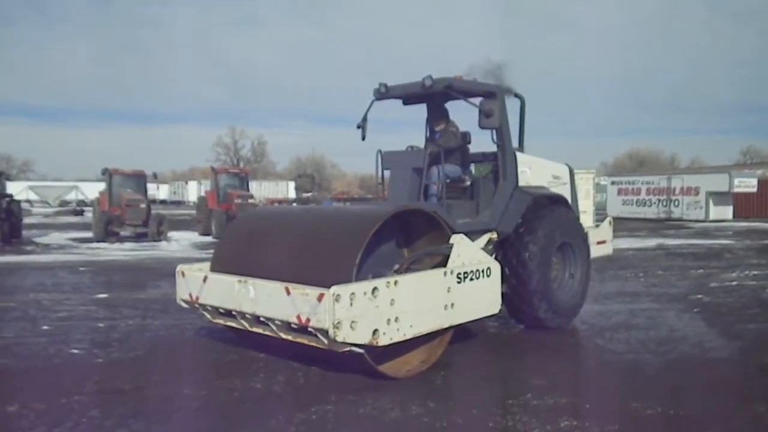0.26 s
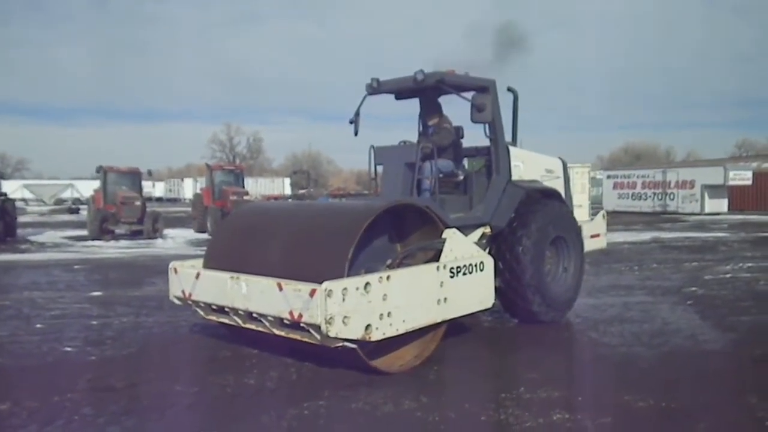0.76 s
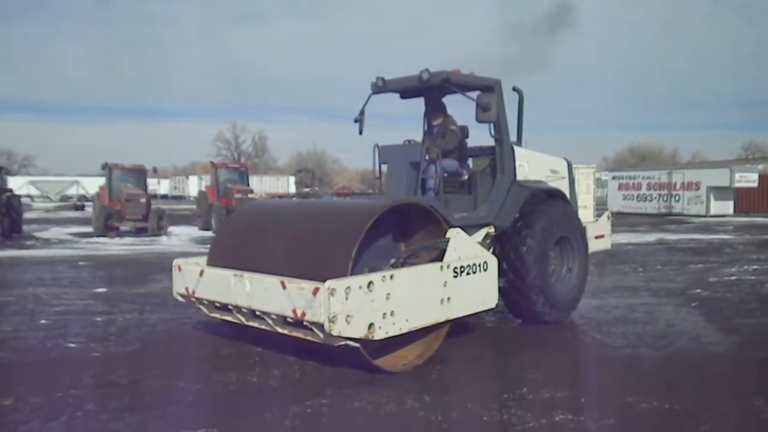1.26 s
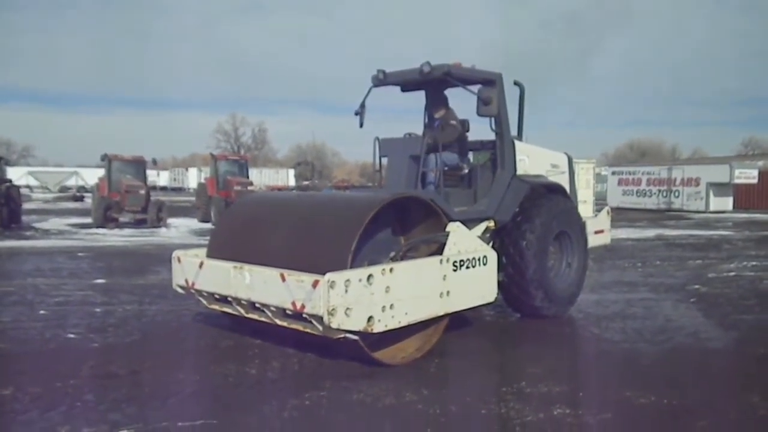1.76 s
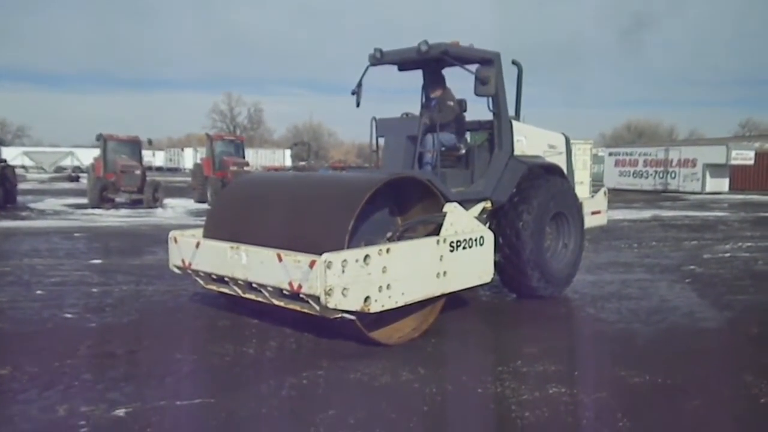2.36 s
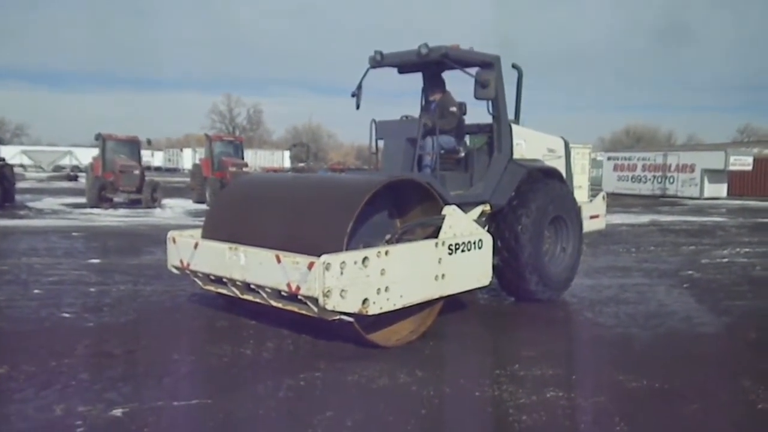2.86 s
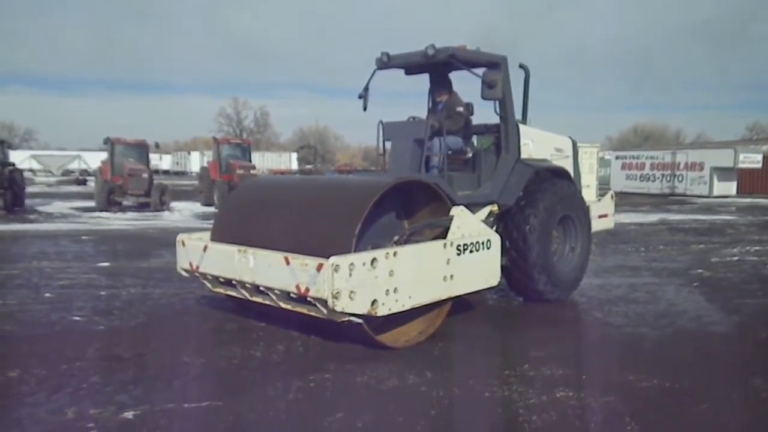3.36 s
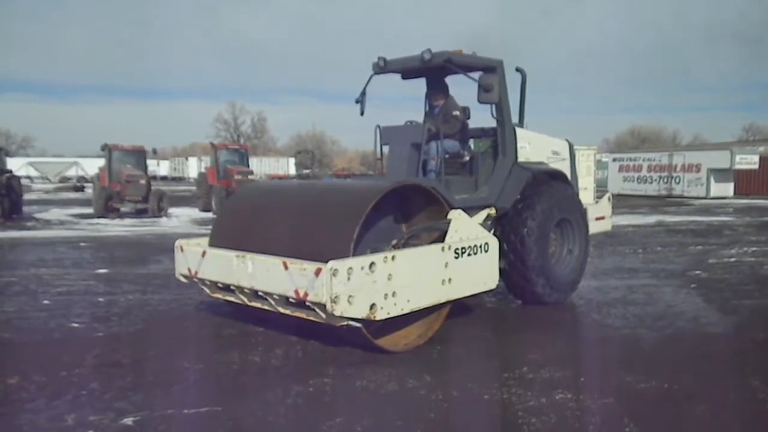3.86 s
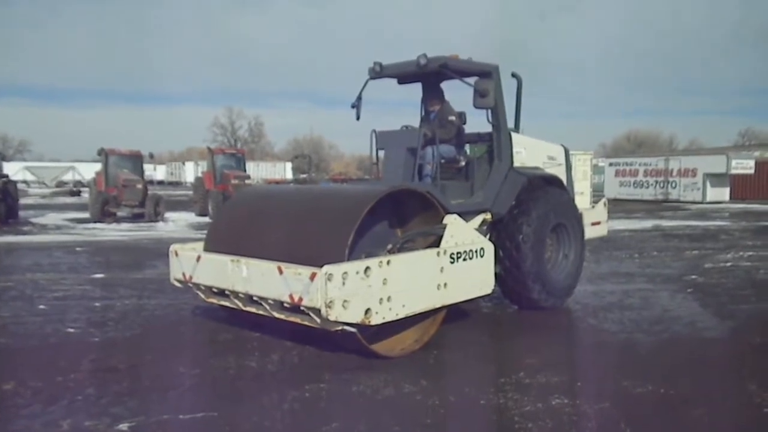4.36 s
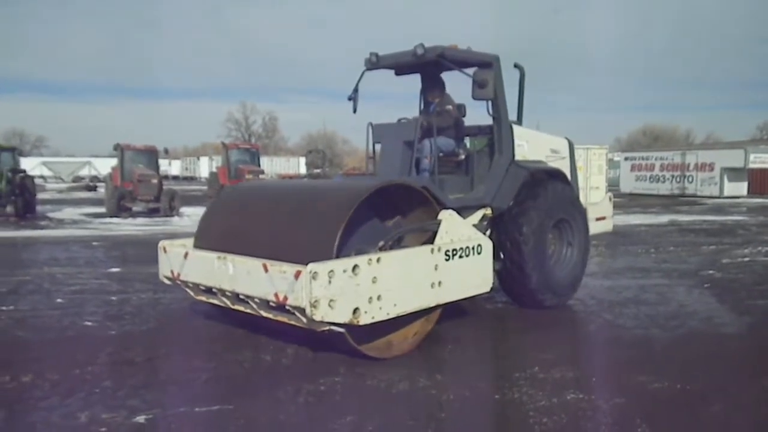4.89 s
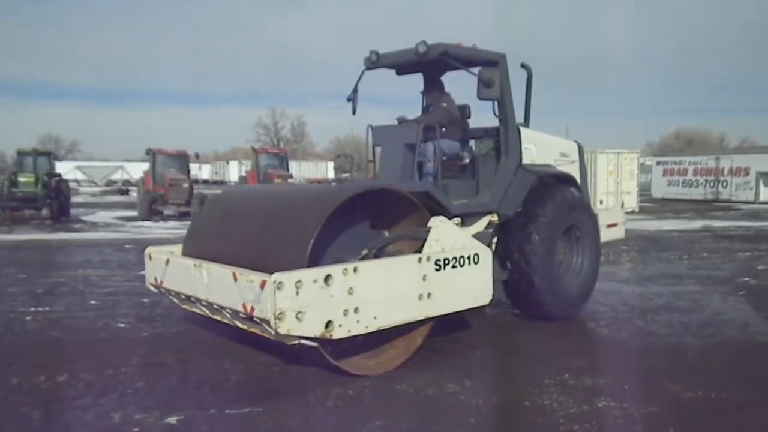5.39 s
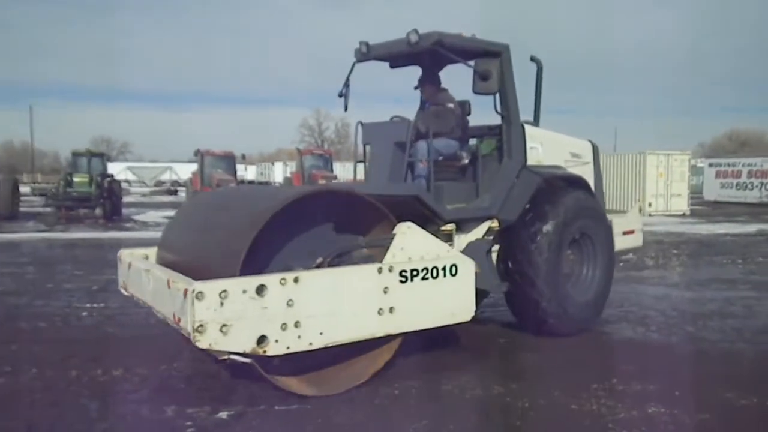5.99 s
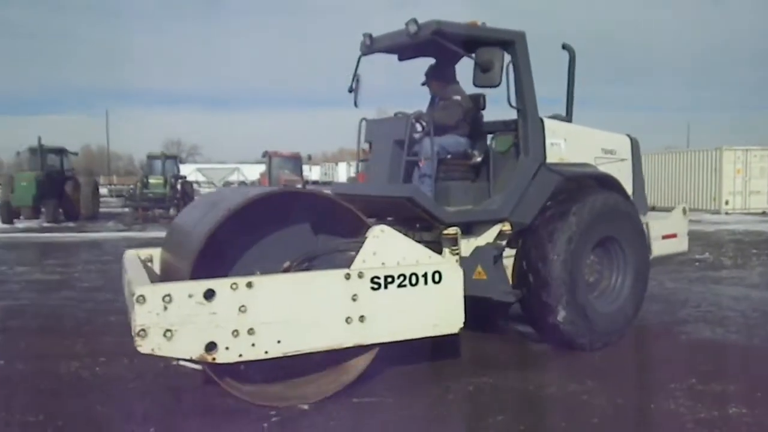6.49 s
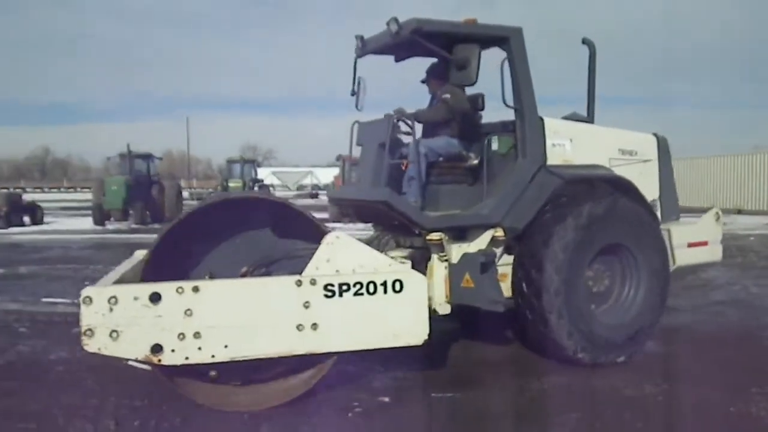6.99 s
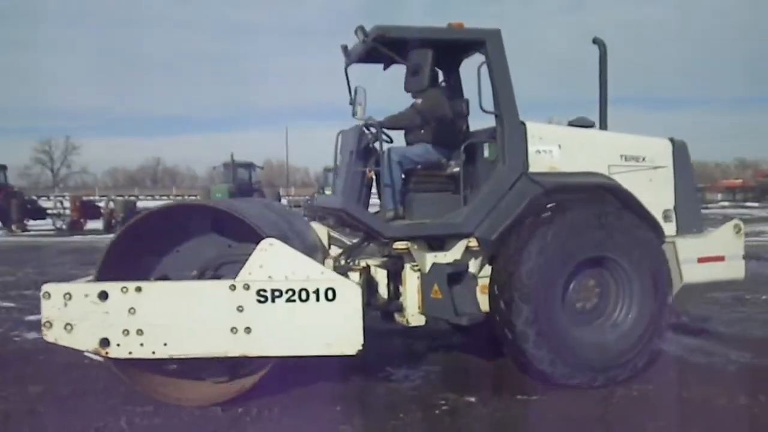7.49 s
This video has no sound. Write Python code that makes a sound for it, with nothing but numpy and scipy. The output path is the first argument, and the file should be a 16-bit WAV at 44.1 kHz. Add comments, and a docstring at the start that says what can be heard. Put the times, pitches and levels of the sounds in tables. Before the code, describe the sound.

A large diesel road roller on an open lot starts with sharp injector spits and hard knocks, then falls to a light clattering idle with a thin whine. At full fuel it knocks hard again, climbs about an octave and a half, and settles into a steady, rattling roar with a singing cooling fan. Close small microphone, thin bass and dull top, slight breeze.

```python
"""First come sharp spits and hard knocks as a six-cylinder diesel road roller drops to idle on open gravel.
Then it takes full fuel, climbs with more knocking and settles at working speed, where the cooling fan sings.
Firings shake noise and ringing from the metal, the exhaust puffs, and sine waves follow the shaft.
A light breeze, a few low thumps and one thin tick are near the small microphone, thin in bass and treble."""
import sys
import numpy as np
from scipy import signal
from scipy.fft import rfft, irfft, next_fast_len
from scipy.io import wavfile
from scipy.ndimage import uniform_filter1d, map_coordinates

SR = 44100
rng = np.random.default_rng(int(sys.argv[2]) if len(sys.argv) > 2 else 0)


def int16_out(signal):
    """Quantize to a 16-bit WAV file."""
    q = np.round(np.clip(np.atleast_2d(signal).T, -1, 1) * 32767)
    wavfile.write(sys.argv[1], SR, q.astype(np.int16))


N = 341334  # length [samples]


def amp(db):
    """Turn decibels into a gain."""
    return 10 ** (np.asarray(db) / 20)


def unit(x):
    """Scale x to an rms of 1."""
    return x / np.sqrt(np.mean(x ** 2) + 1e-20)


def seconds(duration=N / SR):
    """Time of every sample [s]."""
    return np.arange(int(round(duration * SR))) / SR


def curves(rows):
    """Draw straight lines between timed points, one curve for each column after the time."""
    times, *columns = np.transpose(rows)
    return [np.interp(seconds(), times, column) for column in columns]


def wobble(rate):
    """A smooth random curve with rate random points a second."""
    knots = rng.standard_normal(int(N * rate / SR) + 4)
    return map_coordinates(knots, [np.arange(N) * rate / SR])


def coloured(x, points):
    """Shape the pitch balance of x with a filter that never sounds ahead of its input, at rms 1."""
    m = next_fast_len(N + 8192, real=True) // 2 * 2
    hz, db = np.transpose(points)
    gain = amp(np.interp(np.log(np.fft.rfftfreq(m, 1 / SR) + 1), np.log(hz + 1), db))
    # folding the cepstrum puts the filter's response after its input
    cepstrum = irfft(np.log(gain + 1e-6), m)
    cepstrum[1:m // 2] *= 2
    cepstrum[m // 2 + 1:] = 0
    return unit(irfft(rfft(x, m) * np.exp(rfft(cepstrum)), m)[:N])


def patchy(depth_db):
    """Noise that is louder and softer in random patches of time and pitch."""
    noise = signal.stft(rng.standard_normal(N), nperseg=512)[2]
    over_pitch = uniform_filter1d(rng.standard_normal(noise.shape), size=5, axis=0)
    patches = unit(uniform_filter1d(over_pitch, size=12, axis=1))
    return unit(signal.istft(noise * amp(depth_db * patches), nperseg=512)[1][:N])


def sine(cycles, sway, waver_db):
    """A slightly unsteady sine wave: both its level and its phase waver."""
    waver = amp(waver_db * wobble(7))
    return np.sqrt(2) * waver * np.sin(2 * np.pi * cycles + sway * wobble(6))


# Engine speed: (time [s], firings per second [Hz])
ENGINE_SPEED = [(0, 50), (.2, 56), (.45, 37.7), (2.5, 37.7), (2.62, 48.9), (3.72, 106.7), (3.95, 111.8),
                (4.15, 111), (4.55, 108.4), (4.85, 109.8), (6, 110), (6.3, 111.5), (6.5, 111),
                (6.82, 108.3), (7.1, 110.1), (7.4, 111.1), (7.74, 111)]


def firings():
    """Add up the engine speed into a running count of firings."""
    return np.cumsum(curves(ENGINE_SPEED)[0]) / SR


def octaves():
    """Engine speed in octaves above or below the working speed of 110 firings a second."""
    return np.log2(curves(ENGINE_SPEED)[0] / 110)


def turn():
    """The roller swings round: 0 is nose-on, 1 is side-on."""
    start_s, end_s = 5.4, 7.1
    return np.clip((seconds() - start_s) / (end_s - start_s), 0, 1)


# Fuel given to the engine: (time [s], share of full fuel [0-1])
FUEL_SHARE = [(0, 0.7), (.028, .55), (.036, 0.74), (.2, 0.8), (.26, 0.58), (.45, 0.1), (2.535, 0.05),
              (2.545, 0.86), (2.8, 1), (7.74, 0.98)]


def level(no_fuel_db, full_db, octave_db, side_on_db):
    """Level [dB] from fuel, at working speed, plus a change per octave of speed and for the turn."""
    fuel = np.clip(curves(FUEL_SHARE)[0], 0, 1)
    from_fuel = no_fuel_db + fuel * (full_db - no_fuel_db)
    return from_fuel + octave_db * octaves() + side_on_db * turn()


# How strongly each of the six cylinders fires, in firing order: strength [dB]
CYLINDER_STRENGTH = [0.36, -1.5, -2, -2.5, -1, 1.1]


def beat(count, depth, scatter_db, fall):
    """Gain that jumps at every firing and fades until the next, with cylinder and chance differences."""
    number = count.astype(int)
    luck = scatter_db * rng.standard_normal(number[-1] + 1)
    size = amp(np.take(CYLINDER_STRENGTH, number % 6) + luck[number])
    return 1 - depth + depth * size * fall * np.exp(-fall * (count % 1))


# Sharp injector spits as fuel comes on: (time [s], level before the rise and fall are shaped [dB])
INJECTOR_SPITS = [(0.0094, -25), (0.0543, -25), (0.0897, -23), (0.1271, -19), (0.1521, -28), (0.179, -23),
                  (0.2029, -29), (2.5376, -29), (2.5765, -27), (2.6688, -35), (2.7544, -34), (2.7816, -28),
                  (2.8175, -32), (2.8494, -30), (2.9163, -31), (3.0294, -32), (3.1494, -30)]


def spits():
    """Each spit opens the hiss quickly and lets it die away in a few milliseconds."""
    gain, t = np.zeros(N + SR), seconds(.05)
    shape = (1 - np.exp(-t / 0.002)) * np.exp(-t / 0.0046)
    for start_s, db in INJECTOR_SPITS:
        gain[round(start_s * SR):][:len(t)] += amp(db) * shape
    return gain[:N]


# Pitch balance of the injector hiss: (frequency [Hz], relative level [dB per Hz])
HISS_COLOUR = [(2240, -32), (3800, -2.5), (4200, -7.5), (6120, -14), (6960, -21.5), (7790, -20.5),
               (8710, -29), (9680, -28), (11000, -43), (13400, -28), (15500, -40.5)]
# Pitch balance of the very high fizz: (frequency [Hz], relative level [dB per Hz])
FIZZ_COLOUR = [(7000, -120), (9000, -25), (10300, -9), (11000, -13), (11700, -8), (12800, -6), (13300, .5),
               (13800, -8.5), (15000, -13), (15700, -19), (20000, -120)]


def injectors(count):
    """Injectors hiss in step with the firings and spit; a very high fizz shares the hiss's unevenness."""
    uneven = amp(.6 * wobble(11) + 0.41 * wobble(25))
    hiss_gain = amp(level(-49, -39.5, octave_db=-1.5, side_on_db=1.2)) * uneven + spits()
    fizz_gain = amp(level(-85, -59, octave_db=2, side_on_db=-1.5)) * uneven
    pulse = beat(count, depth=0.12, scatter_db=4, fall=1.8)
    hiss = hiss_gain * coloured(pulse * patchy(1.7), HISS_COLOUR)
    return hiss + fizz_gain * coloured(patchy(.9), FIZZ_COLOUR)


def repeating(count):
    """Alternate firings form two banks that shake the metal in their own slowly drifting pattern."""
    number = count.astype(int)
    edge = np.diff(number, prepend=0) > 0
    t, out = seconds(.05), np.zeros(N)
    die_away = amp(-60 * t / 0.047)
    for bank in range(2):
        blows = edge * (number % 2 == bank)
        for shake in rng.standard_normal((3, len(t))):
            out += wobble(1.476) * signal.fftconvolve(blows, shake * die_away)[:N]
    return unit(out)


# Pitch balance of the engine block: (frequency [Hz], relative level [dB per Hz])
BLOCK_COLOUR = [(410, -41), (700, -5.5), (762, -16.5), (842, -3.5), (934, -10.5), (1070, -2), (1400, 1),
                (1590, -3), (1860, -4), (2300, -5), (2990, -21), (5060, -120)]


def block(pulse, same):
    """Pressure blows shake the heavy engine block."""
    gain = amp(level(-41, -24, octave_db=-2.5, side_on_db=2.5))
    return gain * coloured(pulse * patchy(0.2) + 0.29 * same, BLOCK_COLOUR)


# Pitch balance of the sheet covers: (frequency [Hz], relative level [dB per Hz])
COVERS_COLOUR = [(940, -33.5), (1600, -3.5), (1860, -9), (2740, -0.5), (4190, -15.5), (6000, -31),
                 (7800, -42), (13200, -120)]
# Pitch balance of the covers' main way of ringing: (frequency [Hz], relative level [dB per Hz])
RING_COLOUR = [(900, -120), (1900, -35.5), (2400, -1.5), (2700, 3.5), (2950, -5.5), (3600, -21),
               (7000, -120)]


def covers(pulse, same):
    """The same blows rattle the thin sheet covers and ring their main mode."""
    rattle_gain = amp(level(-39.5, -22, octave_db=2, side_on_db=0.8))
    ring_gain = amp(level(-62, -23.5, octave_db=-3, side_on_db=-4))
    rattle = rattle_gain * coloured(pulse * patchy(0.99) + 0.35 * same, COVERS_COLOUR)
    return rattle + ring_gain * coloured(pulse * patchy(0.27) + 0.45 * same, RING_COLOUR)


# Sudden fuel makes every firing knock:
# (start [s], end [s], block strength at start [dB], covers strength at start [dB])
FUEL_SURGES = [(.03, .31, -14.5, -26), (2.54, 3.7, -12.5, -17.5)]
# The hardest firings: (time [s], block strength [dB], covers strength [dB])
HARDEST_KNOCKS = [(.034, -7, -21), (.075, -12, -16), (.113, -16, -13), (2.542, -4.5, -16),
                  (2.594, -10, -17), (2.643, -13, -9.5), (2.847, -19, -11), (2.926, -21, -19),
                  (3.03, -14, -10), (3.121, -12, -9)]


def hard_firings(count):
    """Pick every firing in a surge, fading with some chance, then add the hardest ones."""
    times, rows = np.flatnonzero(np.diff(count.astype(int))) / SR, []
    fade_db, scatter_db = np.array([-8.5, -4]), 4  # change of block and covers over a surge; chance
    for start_s, end_s, *strengths in FUEL_SURGES:
        s = times[(times > start_s) & (times < end_s), None]
        progress = (s - start_s) / (end_s - start_s)
        luck = scatter_db * rng.standard_normal((len(s), 2))
        db = np.array(strengths) + progress * fade_db + luck
        rows += np.hstack([s, db]).tolist()
    return rows + list(HARDEST_KNOCKS)


# Ringing tones, one list for the block and one for the covers:
# (typical frequency [Hz], typical level relative to the knock [dB], time to fall by 60 dB [s])
RINGING_TONES = [(1079, -3, 0.041), (1288, -2.5, 0.032), (1550, -3, 0.025)], [(2630, 1, 0.027),
                 (2857, 3, 0.03), (2950, -15, 0.014)]


def knocks(count):
    """Each hard firing rings tones of block and covers, with chance in their strength and pitch."""
    out, t = np.zeros(N + SR), seconds(1 / 15)
    onset = 1 - np.exp(-t / 0.0023)
    for start_s, *strengths in hard_firings(count):
        for strength_db, modes in zip(strengths, RINGING_TONES):
            for hz, mode_db, t60 in modes:
                luck_level, luck_pitch = rng.standard_normal(2)
                fading = amp(strength_db + mode_db + 2.4 * luck_level - 60 * t / t60)
                ring = fading * np.sin(2 * np.pi * hz * (1 + 0.021 * luck_pitch) * t)
                out[round(start_s * SR):][:len(t)] += ring * onset
    return out[:N]


def combustion(count):
    """Burning fuel strikes block and covers with one shared pulse; hard firings knock on top."""
    same = repeating(count)
    pulse = beat(count, depth=0.12, scatter_db=-4, fall=0.6)
    return block(pulse, same) + covers(pulse, same) + knocks(count)


# Pitch balance of the light clatter: (frequency [Hz], relative level [dB per Hz])
CLATTER_COLOUR = [(470, -40), (800, -10.5), (1060, -2.5), (1450, -2.5), (1560, -5), (1950, -5), (2350, -4),
                  (2470, -4), (2660, -5.5), (4110, -13.5), (5200, -27.5), (7840, -39), (8760, -47.5),
                  (13500, -47), (15500, -67)]


def tickover(count):
    """Valves, gears and belts clatter lightly under everything, pulsing with the firings."""
    gain = amp(level(-23, -23.5, octave_db=-0.4, side_on_db=-1.7) + 0.18 * wobble(5.5))
    pulse = beat(count, depth=0.16, scatter_db=5.0, fall=1.3)
    return gain * coloured(pulse * patchy(0.81), CLATTER_COLOUR)


# Average level of the exhaust rumble: (time [s], level [dB])
RUMBLE_CURVE = [(0, -43.5), (1, -41), (1.66, -45), (2.54, -41), (3.47, -43.5), (3.8, -45.5), (4.96, -38),
                (5.69, -42.5), (6.4, -38), (6.8, -39.5), (7.14, -43), (7.74, -49)]
# Pitch balance of the rumble: (frequency [Hz], relative level [dB per Hz])
RUMBLE_COLOUR = [(12, -56), (20, -38), (76, -17), (183, -2.5), (264, -3.5), (293, -7), (395, -0.5),
                 (450, 4), (580, -14.5), (990, -120)]
# Pitch balance of the roar: (frequency [Hz], relative level [dB per Hz])
ROAR_COLOUR = [(160, -44.5), (280, -15.5), (366, -18), (397, -17.5), (435, -15), (544, -5.5), (603, -5.5),
               (821, -12.5), (1050, -3.5), (1100, -1), (1430, -29), (2420, -120)]


def exhaust(count):
    """Gas puffs from the stack make a dull rumble and a hollow roar."""
    rumble_gain = amp(curves(RUMBLE_CURVE)[0] + 0.9 * wobble(6))
    roar_gain = amp(level(-28.5, -29, octave_db=1.5, side_on_db=0.1) + 1.1 * wobble(6.2))
    puff = beat(count, depth=0.27, scatter_db=-5.0, fall=1.1)
    rumble = rumble_gain * coloured(puff * patchy(1.6), RUMBLE_COLOUR)
    return rumble + roar_gain * coloured(puff * patchy(1.3), ROAR_COLOUR)


# Average level of the air on the microphone: (time [s], level [dB])
BREEZE_CURVE = [(0, -62), (.9, -59), (1.3, -62), (2.2, -58), (3.25, -63), (3.73, -73), (5.99, -74),
                (6.4, -59), (6.92, -75), (7.74, -78)]
# Pitch balance of the breeze: (frequency [Hz], relative level [dB per Hz])
BREEZE_COLOUR = [(10, -30), (25, -17), (60, -6), (110, -6), (200, -11), (400, -46), (1500, -120)]


def breeze():
    """Light air buffets the microphone in lumps of low noise."""
    gain = amp(curves(BREEZE_CURVE)[0] + 2.5 * wobble(8))
    return gain * coloured(rng.standard_normal(N), BREEZE_COLOUR)


# Thin tones that come and go: (frequency [Hz], start [s], end [s], level before wavering [dB])
THIN_TONES = [(2500, .25, 2.6, -32.5), (2918, .35, 2.5, -39), (13500, .3, 2.55, -76), (292, .33, .8, -45),
              (622, 1.4, 2.5, -42), (450, 2, 2.55, -45), (520, 7.3, 9, -41)]


def whines():
    """Thin tones of steady pitch fade in and out, whatever the engine speed."""
    t, out = seconds(), np.zeros(N)
    for hz, start_s, end_s, db in THIN_TONES:
        swell = np.clip(np.minimum(t - start_s, end_s - t) / .06, 0, 1)
        out += amp(db) * swell * sine(hz * t, sway=.25, waver_db=.8)
    return out


# Low thumps: (time [s], strength before the rise and fall are shaped [dB], frequency [Hz])
LOW_THUMPS = [(0.94, -22, 170), (1.137, -23, 290), (1.178, -22, 250), (1.622, -20, 300), (1.851, -22, 200),
              (2.332, -26, 200), (2.464, -21, 165), (2.617, -21, 290), (6.43, -20, 230)]


def thumps():
    """Short soft low pushes close to the microphone swell up and die away."""
    out, t = np.zeros(N + SR), seconds(1 / 15)
    rise_s = 0.0031  # time to the peak; also sets the fall
    shape = t / rise_s * np.exp(-t / rise_s)
    for start_s, db, hz in LOW_THUMPS:
        out[round(start_s * SR):][:len(t)] += amp(db) * shape * np.sin(2 * np.pi * hz * t)
    return out[:N]


# Engine tones: (multiple of the firing rate, peak level at working speed before wavering [dB],
# peak time of the swell [s], fade away from that time [dB per s squared])
ENGINE_TONES = [(.5, -76, 5.2, 1.5), (2, -52.5, 5.1, 2), (2, -45.5, 6.9, 19), (3, -48, 4.9, 8),
                (6, -30.5, 4.58, 202), (6, -37, 6.05, 12), (6, -38.5, 7.84, 32), (9, -36, 5, 12),
                (9, -31, 6.46, 70), (9.5, -31.5, 4.7, 6), (9.5, -31, 7.34, 70), (10, -32, 5.8, 15),
                (10.5, -32, 6.8, 11), (11.5, -45, 6.1, 13), (12, -28.5, 4.58, 110), (14, -31.5, 5.8, 63),
                (14, -30.5, 7.62, 60), (14.5, -33.5, 6.15, 9), (15, -37.5, 5, 11), (20.5, -32, 5.2, 5),
                (21, -28, 4.6, 120), (21, -35, 5.8, 30), (22, -30.5, 4, 18), (24, -36.5, 5.2, 11),
                (25.5, -37, 6.35, 80), (26, -32, 5.5, 29), (26, -37, 7.3, 50)]


def shaft_tones(count):
    """Sines at the firing rate and its multiples follow the shaft; the multiples swell and fade."""
    firing_gain = amp(level(-64, -54.5, octave_db=6, side_on_db=-2.5))
    out = firing_gain * sine(count, sway=0.28, waver_db=1.0)
    rise_db, t = 55 * octaves(), seconds()  # 55 dB per octave of speed
    for multiple, db, peak_s, fade_db in ENGINE_TONES:
        swell_db = rise_db - fade_db * (t - peak_s) ** 2 + wobble(1.33)
        out += amp(db + swell_db) * sine(multiple * count, sway=0.4, waver_db=0.97)
    return out


# The fan tone one octave up, before wavering: (time [s], level [dB])
FAN_OCTAVE_CURVE = [(2.6, -80), (3.35, -51), (3.6, -45), (3.8, -35), (4, -40), (4.3, -34), (5.2, -37),
                    (6.5, -36.5), (6.87, -31.5), (7.2, -42), (7.74, -39)]


def fan(count):
    """The cooling fan sings at the rate its blades pass, and an octave above."""
    passes = 2.2 * count  # blade passes per firing
    blade_gain = amp(level(-83, -36, octave_db=27, side_on_db=-5))
    octave_gain = amp(curves(FAN_OCTAVE_CURVE)[0])
    blade = blade_gain * sine(passes, sway=0.41, waver_db=1.0)
    return blade + octave_gain * sine(2 * passes, sway=0.54, waver_db=1.1)


def scene():
    """Add the machine and the sounds near the microphone in the open air."""
    count = firings()
    engine = injectors(count) + combustion(count) + tickover(count) + exhaust(count)
    tones = whines() + shaft_tones(count) + fan(count)
    return (engine + breeze() + thumps() + tones)[None]


# Dips in the microphone's treble: (centre [Hz], width [Hz], gain at centre [dB])
TREBLE_HOLLOWS = [(8700, 210, -4), (10900, 260, -2.5)]


def record(dry):
    """Add one thin tick, then the small microphone's weak bass, treble dips and upper limit."""
    tick_s, tick_db = 3.5465, -21
    bass_hz, top_hz = 45.3, 15730
    out = np.pad(dry, [(0, 0), (0, SR // 4)])
    out[:, round(tick_s * SR)] += amp(tick_db)  # a single sample
    hz = np.fft.rfftfreq(out.shape[1], 1 / SR)
    dips_db = sum(db * np.exp(-((hz - mid_hz) / width_hz) ** 2) for mid_hz, width_hz, db in TREBLE_HOLLOWS)
    bass = hz ** 2 / (hz ** 2 + bass_hz ** 2)
    response = amp(dips_db) * (hz < top_hz) * bass
    return irfft(rfft(out) * response, out.shape[1])[:, :N]


dry = scene()
out = record(dry)
int16_out(out)
```